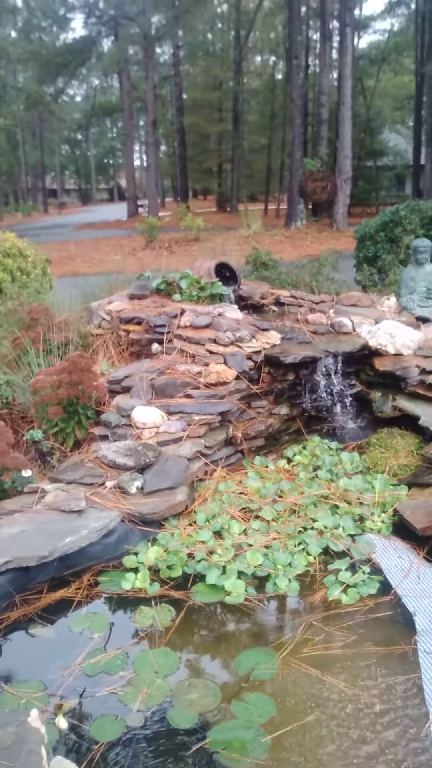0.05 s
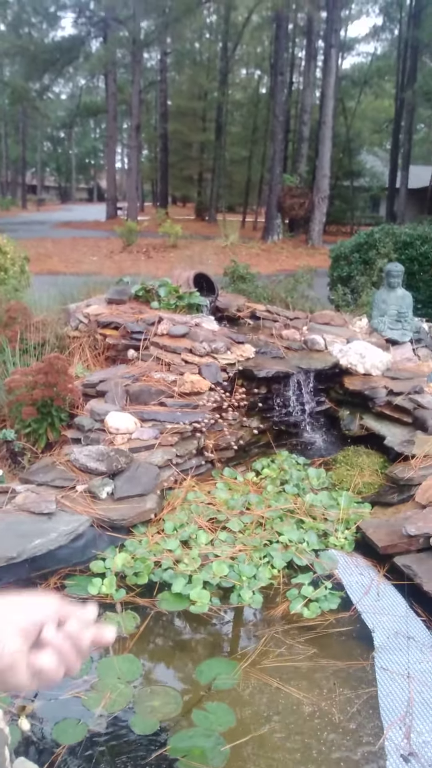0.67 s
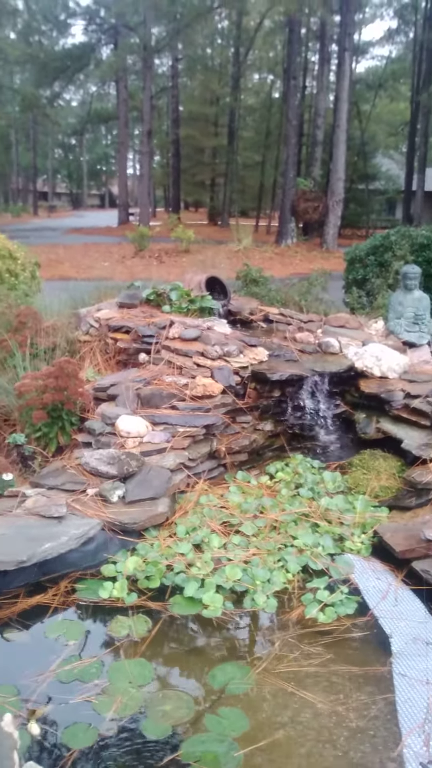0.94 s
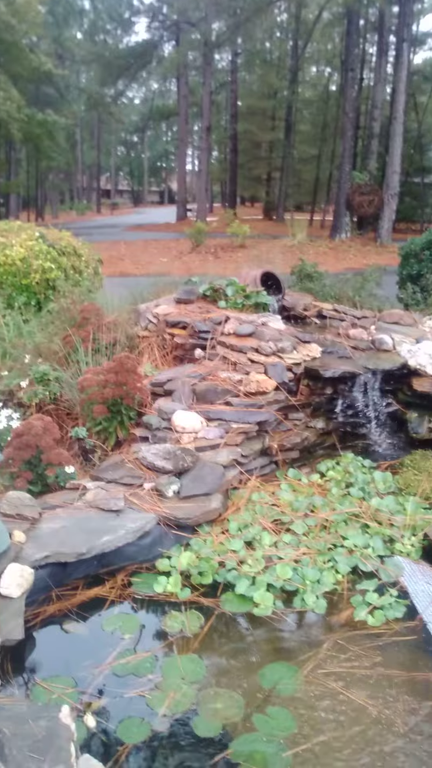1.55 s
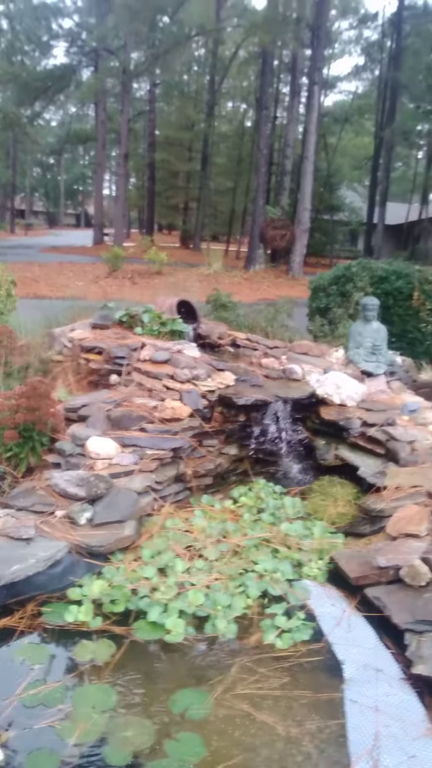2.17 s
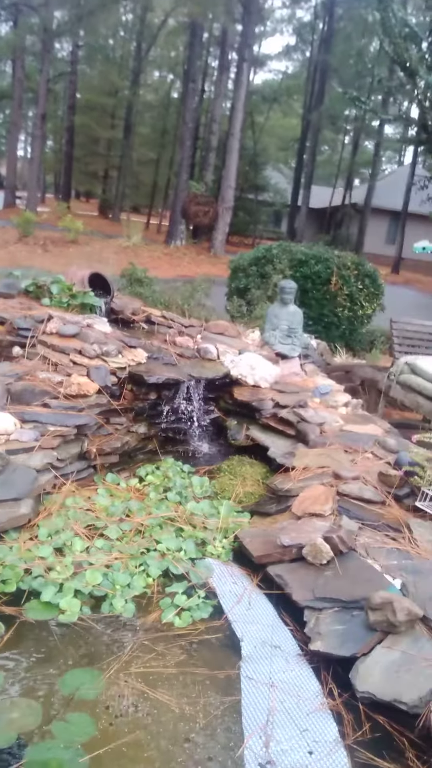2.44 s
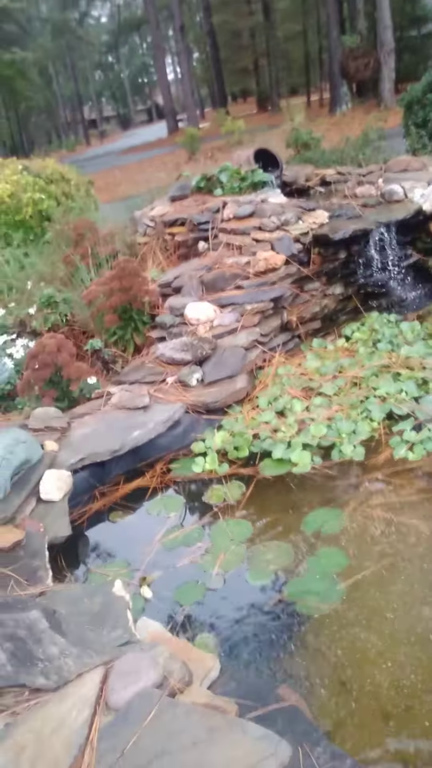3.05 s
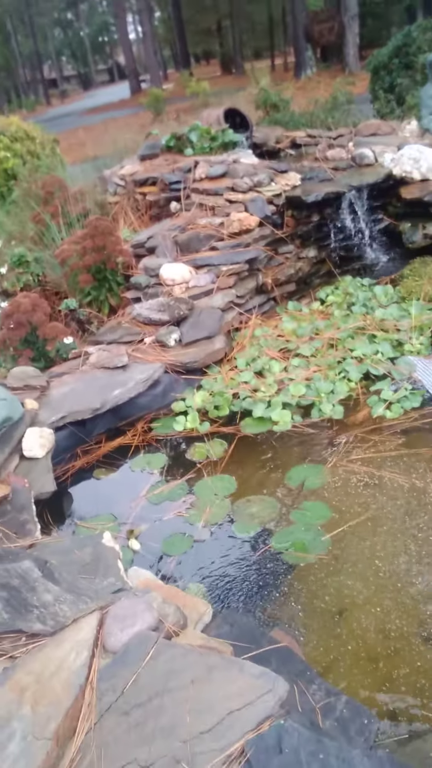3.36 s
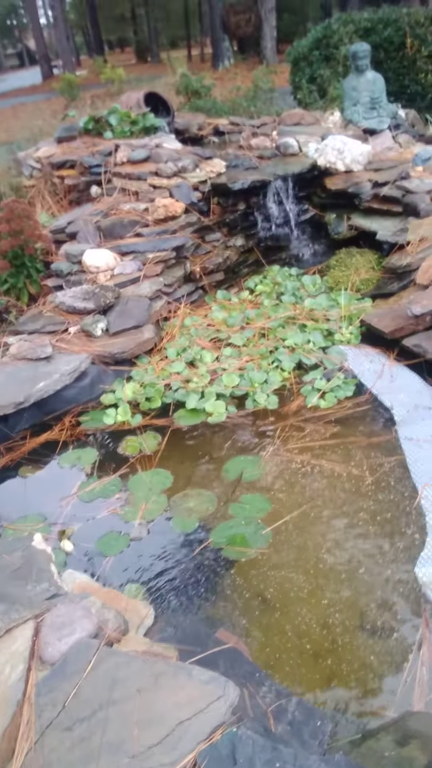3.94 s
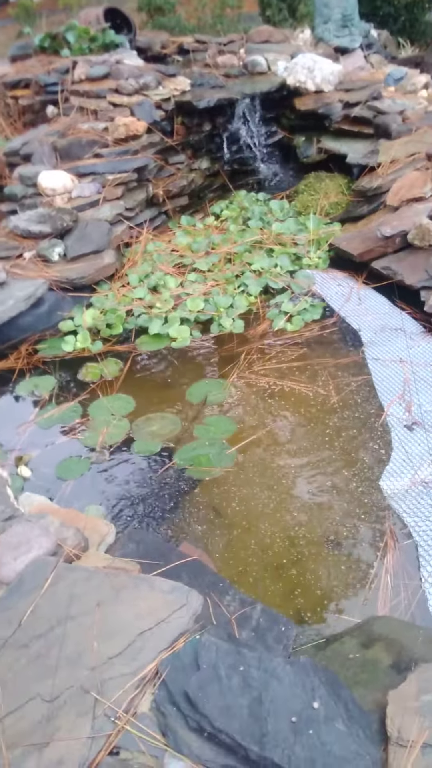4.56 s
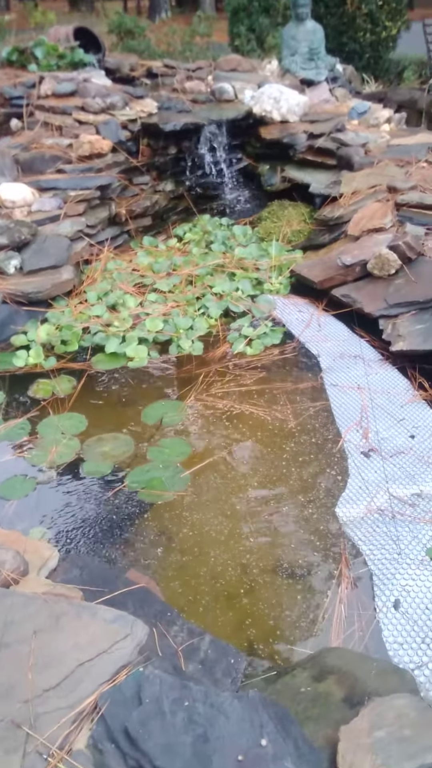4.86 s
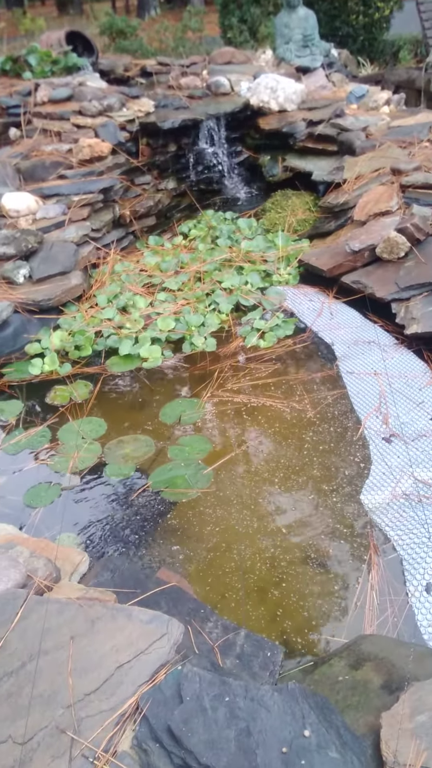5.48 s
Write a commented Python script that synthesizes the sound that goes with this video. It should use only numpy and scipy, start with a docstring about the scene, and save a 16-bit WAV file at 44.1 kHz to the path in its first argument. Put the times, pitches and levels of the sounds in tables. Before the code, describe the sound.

Close to a garden pond, water patters and splashes steadily down a rock ledge, with small ringing bubbles and lower glugs where it lands. A pump hums very faintly under a low outdoor rumble. Midway the splashing turns crisper and the hand-held microphone takes a few dull knocks. Toward the end the gurgling thins while the spatter carries on.

```python
"""A small waterfall spills over stacked stone into a garden pond, heard by a hand-held microphone.
From the start, drops burst on the rock in bright spatters and the stream rings bubbles in the pool,
over a faint outdoor rumble and the hum of the pump. From 2.4 to 2.7 s the microphone tilts down:
the spray turns brighter and a few soft bumps follow. Near the end the gurgle and the rumble fade."""
import sys
import numpy as np
from scipy import signal
from scipy.fft import rfft, irfft, next_fast_len
from scipy.io import wavfile
from scipy.ndimage import uniform_filter1d, map_coordinates

SR = 44100
rng = np.random.default_rng(int(sys.argv[2]) if len(sys.argv) > 2 else 0)


def write(x):
    x = np.atleast_2d(x).T
    wavfile.write(sys.argv[1], SR, np.round(np.clip(x, -1, 1) * 32767).astype(np.int16))


N = 251811
TIME = np.arange(N) / SR
TOP_HZ = 15950  # upper edge of the sound

# where the fall is as the microphone turns: (time [s], left minus right [dB], right side's lead [ms])
DIRECTION = [(0, 1.5, 0.0073), (1.5, 1, 0.019), (2.6, 1, 0.034), (3.1, -2, -0.1), (4.2, -1.5, -0.11),
             (4.6, -0.5, -0.16), (5.7, 0, -0.12)]
# how much water strikes the rock: (time [s], relative level [dB])
WATER_ON_ROCK = [(0.0, -40), (0.45, -41), (0.9, -42), (1.05, -38.5), (1.2, -41.5), (1.65, -39),
                 (1.8, -45.5), (1.95, -40), (2.3, -42), (2.55, -39), (3.01, -43), (3.91, -41.5),
                 (4.26, -43), (4.41, -40.5), (4.51, -45), (4.91, -40.5), (5.61, -45), (5.71, -44)]
# how alike left and right are: (frequency [Hz], likeness [1 = same, -1 or less = opposite])
LIKENESS = [(50, 1), (300, 0.88), (750, 0.81), (1050, -0.47), (1300, -0.069), (1700, -.1), (2200, 0.44),
            (3200, -0.26), (6000, -0.19), (15000, -1.25)]


def spatter(burst_s=.0045, echo_s=.049, count=2600, size=600):
    """Each drop bursts on the rock into fast-dying droplets with an echo; the finest spray hisses."""
    out, t, f = np.zeros((2, N)), np.arange(size) / SR, np.fft.rfftfreq(size, 1 / SR)
    when, pitch, weight, length = rng.random((count, 4)).T
    sign, chance, grain = rng.random((3, count, size), dtype=np.float32)
    droplets = np.sign(sign - .5) * (chance < .56) * gain_of(-2 * np.log(grain + .041))
    droplets[:, 0] = 2.1  # the first hit
    shower = rfft(unit_level(droplets * np.exp(-t / (burst_s * (.5 + length[:, None])))))
    echo = rng.standard_normal((2, count, size), dtype=np.float32) * np.exp(-t / echo_s)
    echo = paired(rfft(unit_level(echo)), f)
    hz = 2000 * 7 ** (pitch[:, None] ** .8)
    angle = np.exp(.92j * rng.standard_normal((count, 1)))  # drops land at slightly different angles
    spectra = (np.array([shower, shower * angle]) + gain_of(-6) * echo) * band(f, hz, octaves=.46)
    strength = gain_of(-1.4 * np.log(weight + .36))
    drops = np.roll(irfft(spectra, size), size // 16, axis=2) * strength[:, None]
    for k in range(count):
        add(out, when[k] * N / SR, drops[:, k])
    mist = gain_of(-3.5) * rng.standard_normal((2, N))
    spray = shifting_echoes(spray_tone(unit_level(out) + mist), depth_db=1.7, frames=20, bins=6)
    return steadied(spray, size=9000) * gain_of(curve(WATER_ON_ROCK, column=1) - 2.5)


def slaps(tick_cycles=1.4, shower_s=.003, late_spray_s=.01, size=2048):
    """A big drop hits with a short tick, bursts into a shower, and its spray patters down after it."""
    # big drops on the stone: (time [s], relative tick level [dB], pitch [Hz], relative shower level [dB])
    big_drops = [(0.1203, -31, 10100, -38), (0.218, -29, 8240, -38), (0.3585, -26, 8260, -36.5),
                 (0.454, -22, 7700, -34.5), (0.517, -30, 10300, -48), (0.5267, -30, 9200, -37.5),
                 (0.669, -22, 9900, -40), (0.775, -22, 9300, -40.5), (0.8177, -25, 10700, -50),
                 (0.988, -23, 10600, -36.5), (1.041, -25, 6660, -43.5), (1.074, -28, 10600, -36),
                 (1.0923, -16, 10500, -37), (1.719, -24, 10700, -36.5), (1.877, -26, 10700, -37.5),
                 (2.486, -24, 10600, -38), (2.5794, -18.5, 7900, -33), (2.7235, -25, 10000, -59),
                 (2.9112, -17.5, 9300, -53), (3.2248, -26, 9100, -37.5), (3.3857, -23, 8800, -38.5),
                 (3.714, -20.5, 8700, -37), (3.772, -28, 10700, -44), (3.8977, -23, 10800, -39),
                 (3.938, -27, 8700, -39.5), (3.9673, -22, 7000, -52), (4.015, -25, 8700, -50),
                 (4.3732, -12.5, 10100, -40), (4.3991, -23, 10000, -35.5), (4.4187, -30, 8640, -56),
                 (4.705, -18, 7640, -41.5), (4.7906, -27, 8680, -50), (4.836, -27, 8600, -54),
                 (4.8569, -24, 7100, -42), (5.0902, -19.5, 9650, -43), (5.468, -31, 9000, -40),
                 (5.5128, -22.5, 9400, -39), (5.6744, -27.5, 9200, -43)]
    out, t = np.zeros((2, N)), np.arange(size) / SR
    for s, tick_db, hz, shower_db in big_drops:
        age = t * hz / tick_cycles
        lag = np.array([[0], [.85 * rng.standard_normal()]])
        tick = age * np.exp(1 - age) * np.sin(2 * np.pi * (hz * t + rng.random()) + lag)
        shower_hz = hz * 2 ** -.067  # a little duller than the tick
        noise = rng.standard_normal((2, size))
        droplets = filtered(noise, lambda f: band(f, shower_hz, .64) / np.hypot(1, (f / 12500) ** 5))
        fade = np.exp(-t / shower_s) + gain_of(-10) * np.exp(-t / late_spray_s)
        shower = unit_level(droplets) * fade
        add(out, s, gain_of(tick_db - 1.5) * tick + gain_of(shower_db + 2.5) * shower)
    return out


def splashes(grain_db=3, size=16384):
    """A lump of water breaks up on the rock in a short, grainy rush; a narrow pitch range rings."""
    # lumps of water: (time [s], length [s], level [dB], middle pitch [Hz], pitch range [octaves])
    lumps = [(0.461, 0.011, -60, 5000, .35), (1.043, 0.097, -44.5, 4500, 0.52),
             (1.304, 0.014, -41, 4900, 0.11), (1.329, .012, -41, 4930, 0.13),
             (1.588, 0.0071, -41, 3820, .6), (2.431, 0.09, -48.5, 3420, 0.85),
             (2.548, 0.08, -49, 3560, 0.73), (2.825, 0.031, -48.5, 2810, .5),
             (3.078, 0.035, -53, 3320, 0.19), (3.214, 0.1, -50, 4200, 1), (3.582, 0.021, -50.5, 3950, 0.23),
             (3.685, 0.081, -49, 3400, 1), (3.987, 0.12, -53.5, 3820, 0.081),
             (4.135, 0.044, -55, 2780, 0.51), (3.895, 0.012, -53, 4520, 0.36), (4.368, 0.018, -48, 3920, 1),
             (4.69, 0.013, -54, 5500, 0.38), (4.854, 0.027, -71, 3000, .7)]
    out, t, f = np.zeros((2, N)), np.arange(size) / SR, np.fft.rfftfreq(size, 1 / SR)
    for s, length_s, db, hz, octaves in lumps:
        grains = rng.standard_normal((2, size)) * (rng.random(size) < .05)
        grains *= gain_of(grain_db * np.minimum(rng.exponential(1, size), 3))
        rush = unit_level(irfft(rfft(grains) * band(f, hz, octaves), size))
        swell = np.sin(np.pi * np.minimum(t / length_s, 1))
        add(out, s, gain_of(db) * rush * swell)
    return out


def pings():
    """Droplets that reach the pool trap tiny, briefly ringing bubbles: the wet edge of the spatter."""
    ring = bubble_crowd(middle_hz=8500, octaves=.35, spread_db=4, cycles=5, count=1500)
    return spray_tone(ring) * gain_of(curve(WATER_ON_ROCK, column=1) - 8)


def trickle():
    """Thin strands of water land and make a patter of small bubbles that echo in the hollow."""
    # tone of the small bubbles: (frequency [Hz], relative level [dB])
    tone = [(1000, -57), (1600, -10), (1900, -0.5), (2350, -1), (2800, -.5), (3500, 1), (4200, 1.5),
            (5000, 6.5), (6000, 11.5), (8000, -6)]
    # how loud they patter: (time [s], level [dB])
    patter = [(0, -53.5), (.5, -54.5), (1.1, -53), (1.4, -55.5), (2.4, -53.5), (2.75, -54), (3.03, -61),
              (3.2, -60), (3.55, -56), (3.75, -54), (4.25, -56), (4.45, -63.5), (4.62, -60.5),
              (4.85, -59.5), (5.2, -56.5), (5.45, -59), (5.58, -67), (5.71, -60.5)]
    ring = bubble_crowd(middle_hz=3204, octaves=.6, spread_db=3, cycles=11, count=3800)
    ring = stone_echoes(with_tone(ring, tone), echo_db=-6, decay_s=.012)
    ring = shifting_echoes(ring, depth_db=3, frames=70, bins=6)
    return steadied(ring) * gain_of(curve(patter, column=1))


def plunge():
    """The stream drives big bubbles under and churns the pool; the hollow behind shapes their tone."""
    # the stream surges and slackens: (time [s], weight of the big bubbles [dB], relative level [dB])
    surges = [(0.0, 6, -45.5), (0.2, 7, -50), (0.45, 2, -56.5), (0.85, -4.5, -55), (1.15, 5.5, -51),
              (1.4, -1, -51.5), (1.78, -15, -60.5), (1.87, 4.5, -49), (2.3, 4.5, -50), (2.6, -2, -53.5),
              (2.72, -15.5, -61.5), (2.96, 0.5, -55), (3.46, -5.5, -56.5), (3.6, -12, -62.5),
              (3.76, 2, -50.5), (4.1, 4, -53.5), (4.46, -2.5, -57.5), (4.62, -15, -64), (4.77, -14, -77),
              (4.83, -1.5, -59.5), (5.02, -17.5, -59.5), (5.26, -20, -54.5), (5.36, -11, -72),
              (5.45, -19.5, -63), (5.71, -29, -72.5)]
    # tone of the hollow: (frequency [Hz], relative level [dB])
    hollow = [(150, -23), (250, -8), (310, 0), (390, 1.5), (490, -8), (640, -1), (780, 3), (950, -0.5),
              (1500, -30)]
    weight = curve(surges, column=1)  # more weight: lower, more varied and louder bubbles
    hz = 560 * 2 ** (-.015 * weight)
    octaves = np.maximum(.398 + .011 * weight, .27)
    level_db = curve(surges, column=2) + .14 * np.maximum(weight, 0) - 7
    ring = bubble_crowd(hz, octaves, spread_db=1.8, cycles=4.5, count=1800)
    ring = steadied(with_tone(ring, hollow), size=2500)
    # the churning is noise that follows the pitch of the bubbles
    f, t, noise = signal.stft(rng.standard_normal((2, N)), SR, nperseg=1024)
    shape = band(f[:, None], np.interp(t, TIME, hz), .79 * np.interp(t, TIME, octaves))
    churn = signal.istft(paired(noise, f[:, None]) * shape, nperseg=1024)[1][:, :N]
    churn = gain_of(-.5) * steadied(with_tone(churn, hollow), size=2500)
    return shifting_echoes(ring + churn, depth_db=1.7, frames=30, bins=3) * gain_of(level_db)


def plinks(cycles=7):
    """A drop in open water traps one bubble, and four smaller ones break off just after it."""
    # bubbles that stand out: (time [s], level [dB], pitch [Hz])
    single_bubbles = [(.018, -34, 4700), (.151, -37.5, 597), (.218, -37, 2450), (.517, -36.5, 3100),
                      (1.029, -39, 2240), (1.584, -30.5, 2350), (1.781, -36.5, 2630), (2.217, -38, 658),
                      (2.459, -43, 1410), (2.657, -39, 2480), (3.192, -40.5, 2100), (3.419, -41, 2800),
                      (3.938, -40, 2380), (4.15, -43, 1800), (4.961, -42, 2010), (5.006, -40, 2650)]
    out = np.zeros((2, N))
    for s, db, hz in single_bubbles:
        add(out, s, gain_of(db) * bubble(hz, cycles, rng.random(), lag=1))
        for late, step, turn in rng.random((4, 3)):
            smaller = bubble(hz * 2 ** (.6 * step), cycles, turn, lag=1)
            add(out, s + .015 * late, gain_of(db - 11) * smaller)
    return stone_echoes(out, echo_db=-6, decay_s=.028)


def glugs(bubbles_per_s=220, octaves=.084, size=12000):
    """A pocket of air breaks into a run of bubbles whose pitch slides as their size changes."""
    # runs of big bubbles: (time [s], length [s], level [dB], first pitch [Hz], last pitch [Hz])
    runs = [(1.074, 0.026, -53, 816, 860), (1.165, 0.041, -52.5, 620, 650), (1.595, 0.13, -54, 764, 616),
            (1.724, 0.084, -54.5, 605, 592), (1.814, 0.087, -56, 634, 420), (2.02, .15, -57.5, 408, 390),
            (3.053, 0.055, -61, 740, 578), (3.615, 0.012, -55, 637, 689), (3.74, 0.032, -57.5, 816, 750),
            (4.481, 0.03, -52, 680, 715), (4.822, .12, -62.5, 782, 767), (5.384, 0.051, -58, 750, 650)]
    out, t = np.zeros((2, N)), np.arange(size) / SR
    for s, length_s, db, first_hz, last_hz in runs:
        run = np.zeros((2, size))
        for age in np.arange(0, length_s, 1 / bubbles_per_s):
            hz = first_hz + (last_hz - first_hz) * age / length_s
            hz *= 2 ** (octaves * rng.standard_normal())
            swell = np.sqrt(np.sin(np.pi * age / length_s))
            add(run, age, swell * bubble(hz, cycles=6, turn=rng.random(), lag=.44))
        add(out, s, gain_of(db) * run / run[:, t < length_s].std())
    return out


def slosh(upright_hz=1339, tilted_hz=1148):
    """Medium bubbles come in flurries as water slops about at the foot of the fall."""
    # flurries of sloshing: (time [s], relative level [dB])
    flurries = [(0.0, -58), (0.01, -60), (0.29, -63), (0.63, -95), (0.67, -73), (0.76, -94), (1.06, -60),
                (1.43, -69.5), (1.49, -84), (1.51, -60.5), (1.64, -90), (1.73, -84), (1.81, -89),
                (1.96, -60.5), (2.29, -61.5), (2.43, -80), (2.46, -62), (2.53, -76), (2.62, -82),
                (2.64, -62.5), (2.72, -72.5), (3.28, -64.5), (3.45, -85), (3.69, -85), (3.72, -59),
                (3.85, -77), (4.17, -81), (4.31, -89), (4.33, -72), (4.53, -86.5), (5.26, -67), (5.61, -81),
                (5.69, -67), (5.71, -77)]
    hz = upright_hz + tilt() * (tilted_hz - upright_hz)
    ring = bubble_crowd(hz, octaves=.33, spread_db=1.5, cycles=9, count=3000)
    ring = filtered(ring, lambda f: band(f, hz=1250, octaves=.28))
    return steadied(ring, size=3000) * gain_of(curve(flurries, column=1) + 1)


def bumps(size=12000):
    """Dull knocks as the microphone moves: a low tone swells and dies at once, with a little rustle."""
    # soft knocks: (time [s], level [dB], pitch [Hz], time to the peak [s], left minus right [dB])
    knocks = [(2.169, -66, 118, 0.016, -2), (2.862, -39, 316, 0.002, -13), (2.883, -53, 113, 0.0072, -16),
              (2.955, -60, 131, 0.0069, -16), (3.261, -60, 160, 0.0077, -10), (3.605, -64, 81, 0.014, -25),
              (3.712, -60.5, 94, 0.011, -34), (3.737, -63, 173, 0.014, -18), (4.85, -57, 187, 0.017, -8)]
    out, t = np.zeros((2, N)), np.arange(size) / SR
    for s, db, hz, rise_s, side_db in knocks:
        rustle = unit_level(filtered(rng.standard_normal((2, size)), lambda f: band(f, hz, octaves=1)))
        knock = np.sin(2 * np.pi * hz * t) + gain_of(-11) * rustle
        swell = t / rise_s * np.exp(1 - t / rise_s)
        add(out, s, gain_of(db) * balance(side_db) * knock * swell)
    return out


def rumble_and_pump():
    """Faint outdoor rumble and the pond pump's hum swell and fade together, leaning to the right."""
    # tone of the outdoor air: (frequency [Hz], relative level [dB])
    air_tone = [(20, -33), (35, -19), (58, 3.5), (90, -0.5), (122, 8), (150, 0), (182, 2), (230, -7.5),
                (300, -4.5), (500, -29), (1300, -23), (5000, -26)]
    # notes of the pump's hum: (pitch [Hz], relative level [dB])
    pump_notes = [(121, -88.5), (181, -82.5), (300, -82.5)]
    # slow swells of both: (time [s], gain [dB])
    swells = [(0, -1), (.6, 3), (1.2, -3.5), (1.7, -2.5), (2.05, -1), (2.3, 5), (2.7, -5.5), (3.1, 1.5),
              (3.45, -6.5), (3.9, -1.5), (4.2, -10.5), (4.4, 2), (4.7, -10), (5.0, -11), (5.7, -14.5)]
    size = next_fast_len(N)
    spectra = paired(rfft(rng.standard_normal((2, size))), np.fft.rfftfreq(size, 1 / SR))
    rumble = gain_of(-72.5) * with_tone(irfft(spectra, size)[:, :N], air_tone)
    hum = sum(gain_of(db) * np.sqrt(2) * np.sin(2 * np.pi * (hz * TIME + rng.random()))
              for hz, db in pump_notes)
    return (rumble + hum) * gain_of(curve(swells, column=1)) * balance(-11)


def bubble(hz, cycles, turn, lag, climb=.008):
    """Trapped air swells, rings for some cycles, and climbs a little in pitch as it nears the surface."""
    age = np.arange(0, 4, hz / cycles / SR)  # in decay times
    phase = 2 * np.pi * (cycles * (age + climb * age ** 2 / 2) + turn) + np.array([[0], [lag]])
    return np.sin(phase) * np.exp(-age) * (1 - np.exp(-age * cycles / 2))


def bubble_crowd(middle_hz, octaves, spread_db, cycles, count):
    """Bubbles of random size ring at random times around a middle pitch."""
    out = np.zeros((2, N))
    when, softness, turn = rng.random((3, count))
    pitch, side = rng.standard_normal((2, count))
    at = (when * N).astype(int)
    octaves_away = (octaves * np.ones(N))[at] * pitch
    hz = np.minimum((middle_hz * np.ones(N))[at] * 2 ** octaves_away, TOP_HZ)
    same = look_up(LIKENESS, hz)
    # how far the left and right waves are out of step, in radians
    lag = side * np.sqrt(-2 * np.log(np.clip(abs(same), .02, 1))) + np.pi * (same < 0)
    gain = gain_of(-spread_db * np.log(softness + .03))
    for k in range(count):
        add(out, at[k] / SR, gain[k] * bubble(hz[k], cycles, turn[k], lag[k]))
    return out


def stone_echoes(x, echo_db, decay_s, size=4000, count=6):
    """The stacked rock scatters short echoes, which change as the microphone sways."""
    out, t, hop = x.copy(), np.arange(size) / SR, N // count + 1
    for k in range(count + 1):
        echoes = rng.standard_normal((2, size)) * (rng.random((2, size)) < .1)
        echoes *= np.exp(-t / decay_s) * (t > .001)
        echoes = irfft(paired(rfft(echoes), np.fft.rfftfreq(size, 1 / SR)), size)
        echoes /= np.linalg.norm(echoes[0])
        at = np.arange(max((k - 1) * hop, 0), min((k + 1) * hop, N))
        part = x[:, at] * np.cos(np.pi / 2 * (at / hop - k))  # each part fades into the next
        add(out, at[0] / SR, gain_of(echo_db) * signal.fftconvolve(part, echoes, axes=1))
    return out


def shifting_echoes(x, depth_db, frames, bins):
    """Echoes shift as water and microphone move, so the tone drifts in patches of time and pitch."""
    spectra = signal.stft(x, nperseg=512)[2]
    patches = rng.standard_normal(spectra.shape)
    # the patches are smoothed along time (axis 2), then along pitch (axis 1)
    for width, axis in (frames // 2, 2), (frames // 5, 2), (bins, 1), (bins // 2, 1):
        patches = uniform_filter1d(patches, width, axis)
    drift = gain_of(depth_db * unit_level(patches + patches.mean(0)))
    return signal.istft(spectra * drift, nperseg=512)[1][:, :N]


def spray_tone(x):
    """The spray sounds brighter once the microphone tilts down."""
    # tone of the spray before the tilt: (frequency [Hz], relative level [dB])
    upright = [(900, -45), (1600, -24), (2250, -11), (2800, -19), (3500, -15), (4200, -20), (4700, -8.5),
               (5700, -7), (7200, -9.5), (8100, -3), (8700, -3.5), (9250, -1.5), (9700, -3), (10450, 0),
               (11300, -4.5), (12300, -8.5), (16000, -8)]
    # and after it: (frequency [Hz], relative level [dB])
    tilted = [(900, -60), (1550, -33), (1900, -5), (2400, -8), (3100, -20.5), (4200, -5), (5300, -0.5),
              (6400, 3), (8800, 8.5), (10500, 9.5), (13000, 3), (16000, 1.5)]
    return (1 - tilt()) * with_tone(x, upright) + tilt() * with_tone(x, tilted)


def tilt(start_s=2.4, end_s=2.7):
    """How far the microphone has tilted down, 0 to 1."""
    return np.clip((TIME - start_s) / (end_s - start_s), 0, 1)


def arrival_gap(x):
    """The direct sound reaches one side of the microphone a little before the other."""
    lead = curve(DIRECTION, column=2) * SR / 1000
    return np.array([x[0], map_coordinates(x[1], [np.arange(N) + lead], order=4)])


def balance(db):
    """Left and right gains that put the left db above the right."""
    return gain_of(db * np.array([[.5], [-.5]]))


def paired(spectra, hz):
    """Makes two unrelated spectra as alike as left and right are."""
    same = np.clip(look_up(LIKENESS, hz), -1, 1)
    return np.array([spectra[0], same * spectra[0] + np.sqrt(1 - same ** 2) * spectra[1]])


def shared_out(x, table):
    """Shares each frequency between left and right."""
    return filtered(x, lambda f: np.sqrt(2 / (1 + gain_of(look_up(table, f) * np.array([[-2], [2]])))))


def steadied(x, size=8000):
    """Evens out slow swells, keeping the fast ones."""
    power = uniform_filter1d(uniform_filter1d((x ** 2).mean(0), size), size // 2)
    return x / np.sqrt(abs(power) + 1e-9)


def with_tone(x, table):
    """Filters by a tone table, then scales to level 1."""
    return unit_level(filtered(x, lambda f: gain_of(look_up(table, f))))


def filtered(x, gain):
    """Applies gain, a function of frequency."""
    size = next_fast_len(x.shape[-1])
    return irfft(rfft(x, size) * gain(np.fft.rfftfreq(size, 1 / SR)), size)[..., :x.shape[-1]]


def band(f, hz, octaves):
    """A bell of gain around hz."""
    return np.exp(-.5 * ((np.log2(f + 1) - np.log2(hz)) / octaves) ** 2)


def look_up(table, hz):
    """A frequency table's value at hz."""
    f, value = np.transpose(table)
    return np.interp(np.log(hz + 1), np.log(f + 1), value)


def curve(table, column):
    """One column of a time table, sample by sample."""
    columns = np.transpose(table)
    return np.interp(TIME, columns[0], columns[column])


def add(mix, s, sound):
    """Mixes a stereo sound in at time s."""
    part = mix[:, max(round(s * SR), 0):][:, :sound.shape[1]]
    part += sound[:, :part.shape[1]]


def unit_level(x):
    """Scales to an average (rms) level of 1."""
    return x / np.sqrt(np.mean(x ** 2) + 1e-20)


def gain_of(db):
    """Turns decibels into a multiplier."""
    return 10 ** (np.asarray(db) / 20)


def scene():
    """The fall, moving left or right as the microphone turns, over the quiet garden."""
    on_rock = arrival_gap(spatter() + slaps()) + splashes()
    in_pool = pings() + trickle() + plinks() + slosh() + glugs() + plunge()
    return balance(curve(DIRECTION, column=1)) * (on_rock + in_pool) + bumps() + rumble_and_pump()


def record(dry):
    """Each side of the microphone has its own tone, and the highest treble is cut."""
    # how the sides differ before the tilt: (frequency [Hz], left minus right [dB])
    upright = [(50, 7), (130, 8.5), (350, 1), (520, 2), (700, -9), (950, -22), (1150, 6.5), (1380, -5),
               (1650, 20), (2000, 6), (2400, -11), (2800, -4), (3300, -8), (3700, 2), (4150, 13),
               (4700, -7.5), (5400, -7), (6500, -3), (8000, -7.5), (10500, -3), (13000, -1.5)]
    # and after it: (frequency [Hz], left minus right [dB])
    tilted = [(50, -1), (130, 6), (350, 4), (560, 5.5), (800, -0.5), (1080, -3.5), (1350, 0), (1600, 1),
              (2000, 1.5), (2500, -2), (3500, 0), (5000, 1.5), (8500, -1.5), (10500, 2.5), (13000, 3)]
    heard = (1 - tilt()) * shared_out(dry, upright) + tilt() * shared_out(dry, tilted)
    lowpass = signal.firwin(511, TOP_HZ, window=("kaiser", 9), fs=SR)
    return signal.oaconvolve(heard, lowpass[None], "same")


dry = scene()
out = record(dry)
write(out)
```